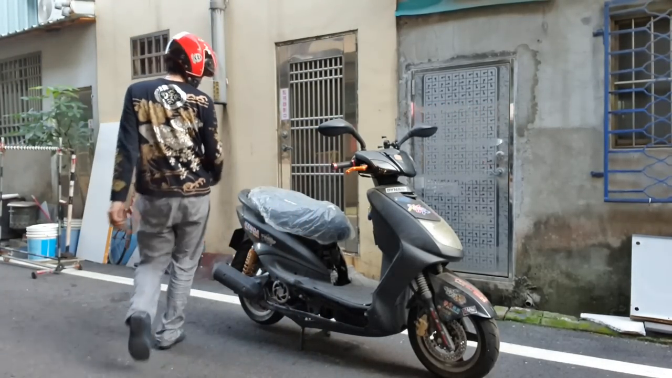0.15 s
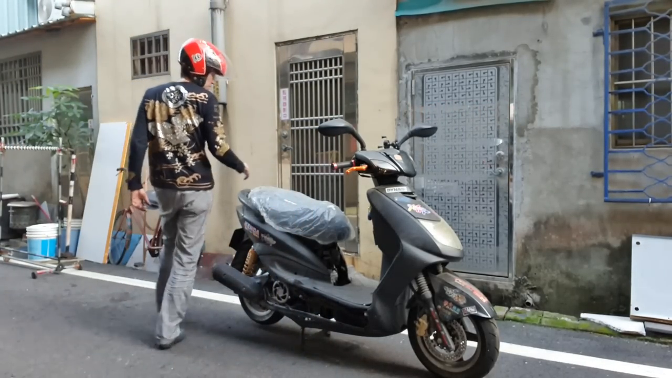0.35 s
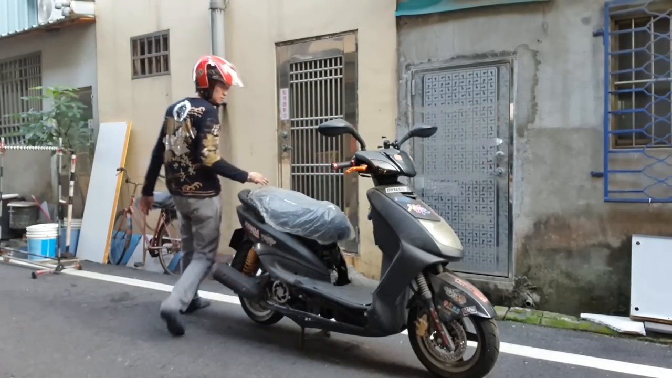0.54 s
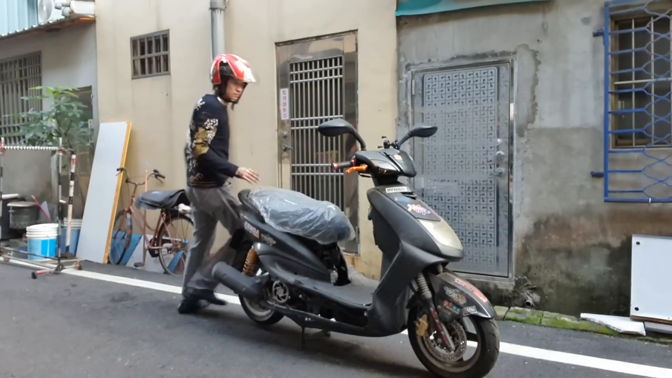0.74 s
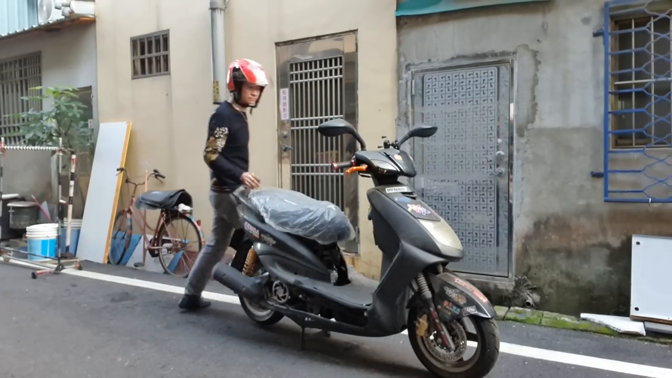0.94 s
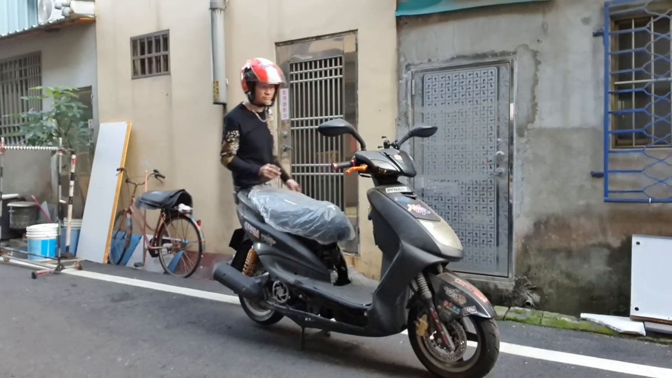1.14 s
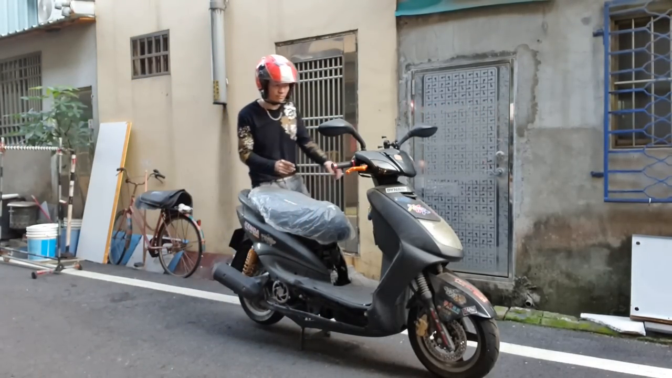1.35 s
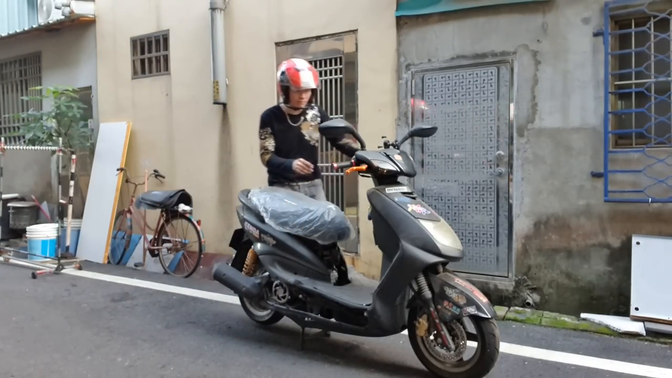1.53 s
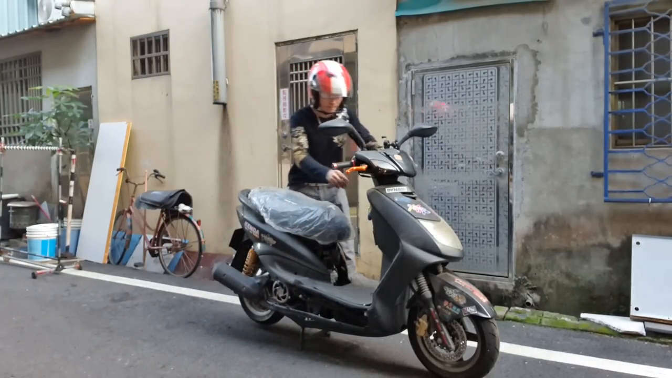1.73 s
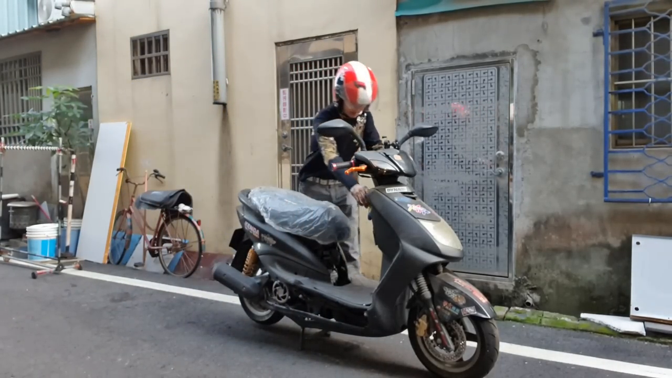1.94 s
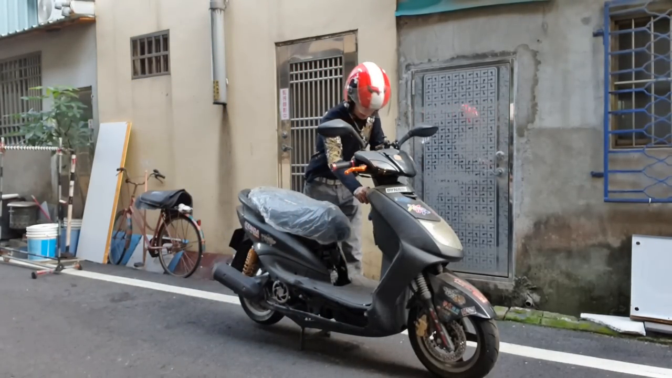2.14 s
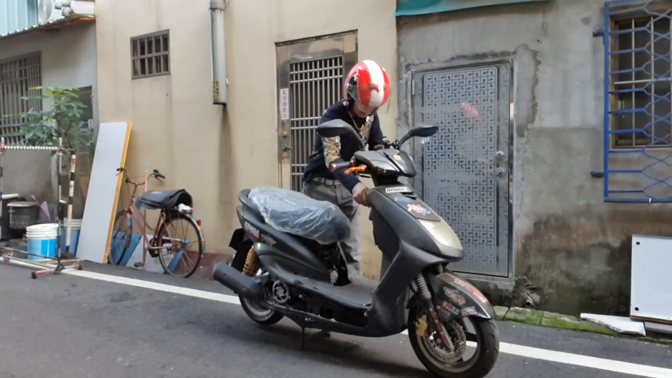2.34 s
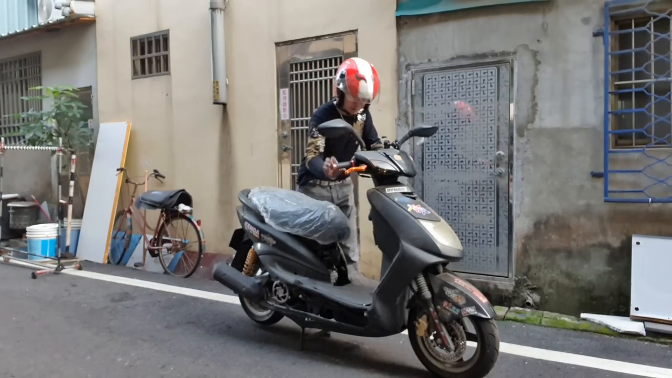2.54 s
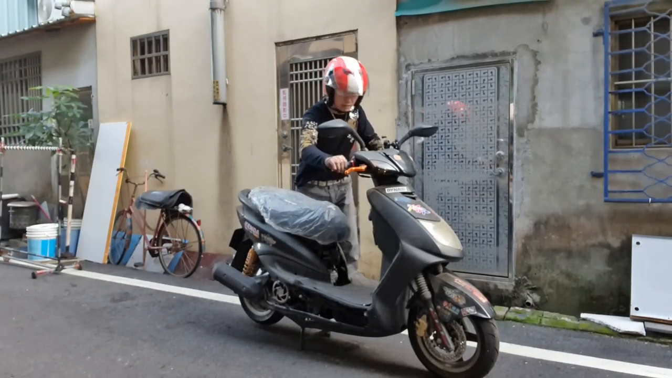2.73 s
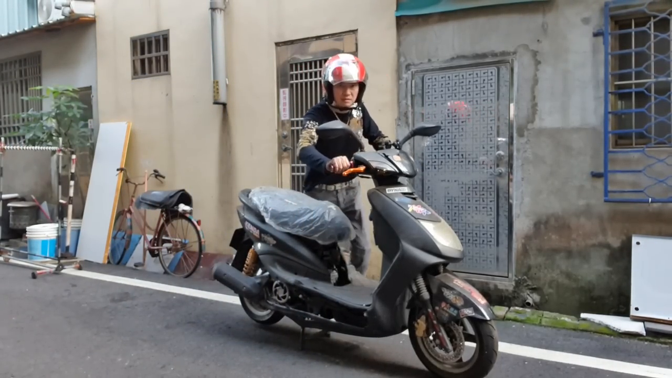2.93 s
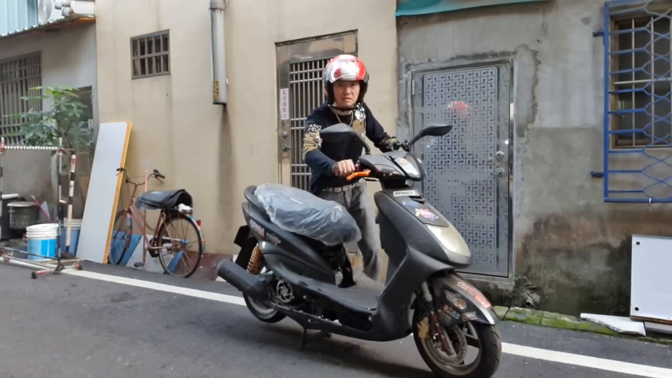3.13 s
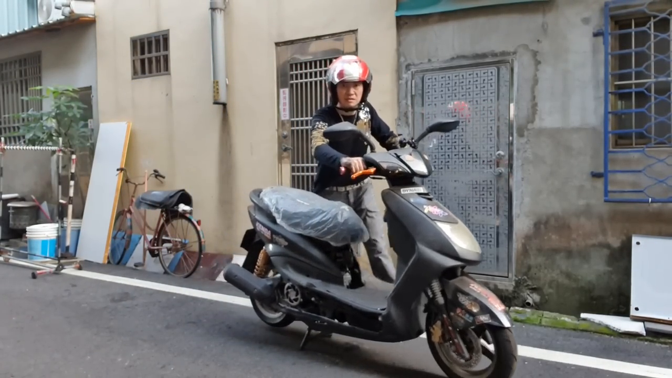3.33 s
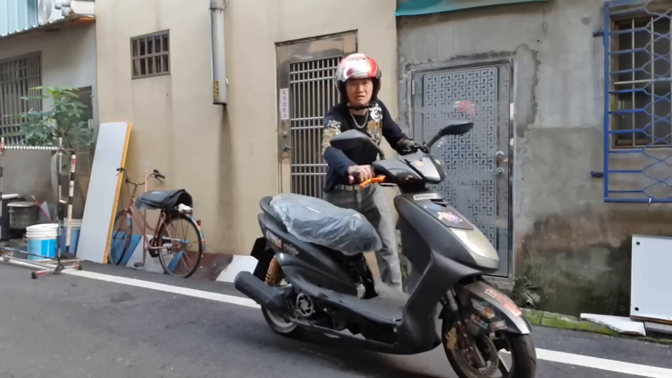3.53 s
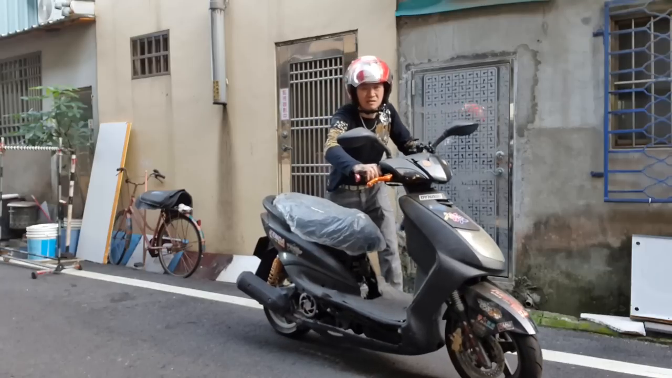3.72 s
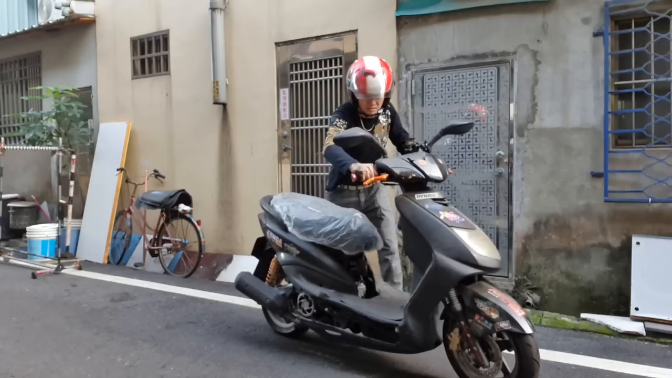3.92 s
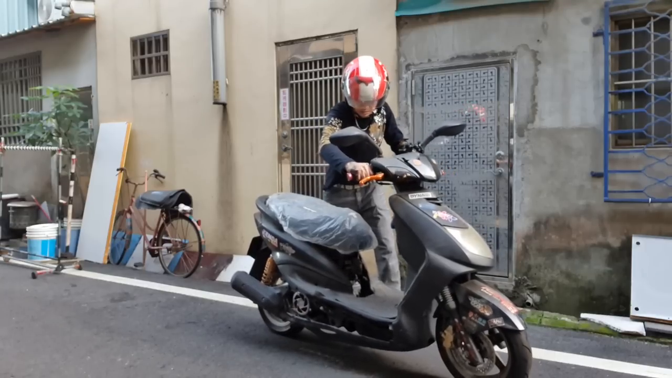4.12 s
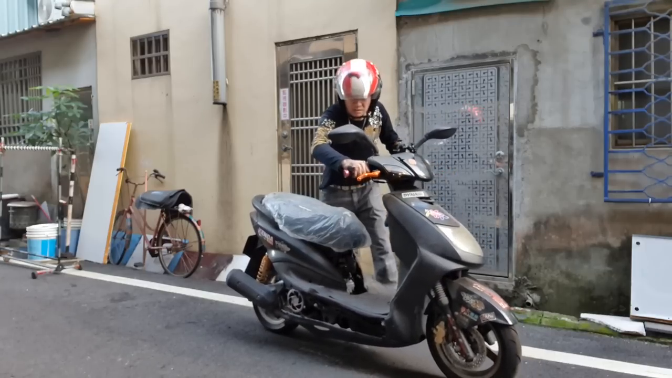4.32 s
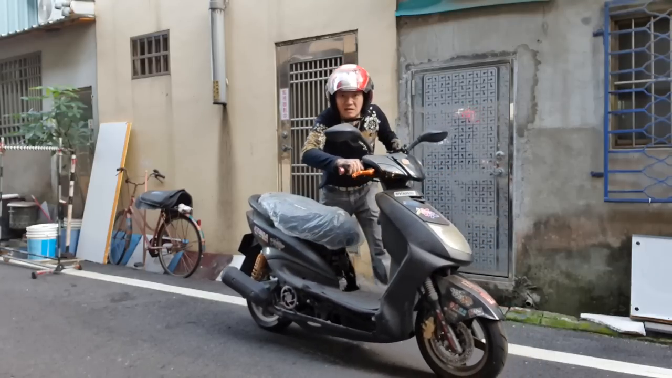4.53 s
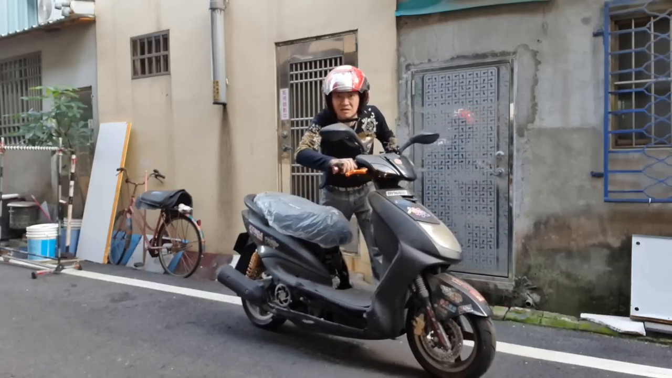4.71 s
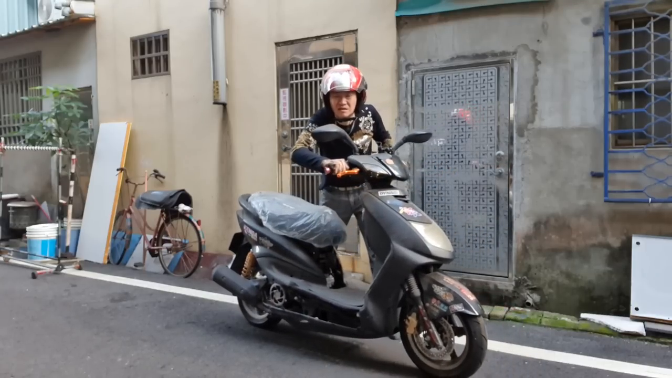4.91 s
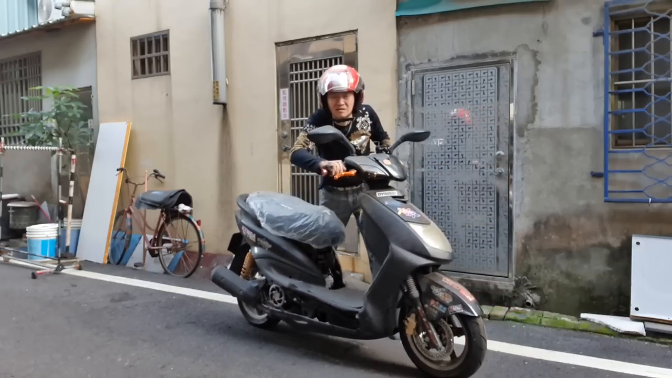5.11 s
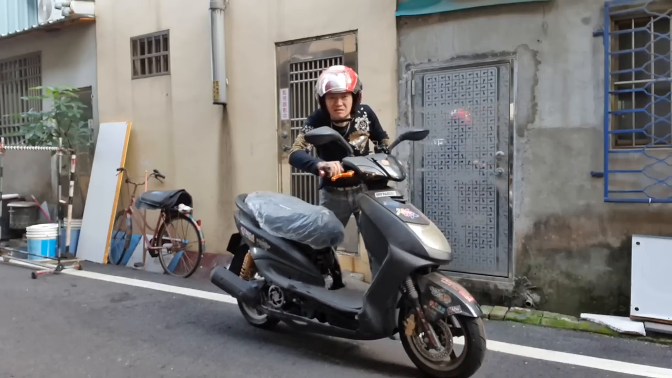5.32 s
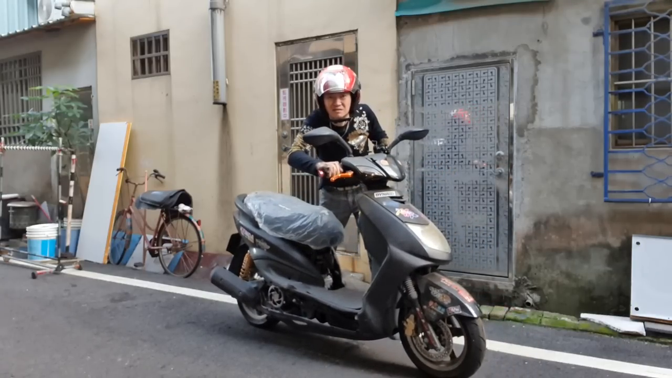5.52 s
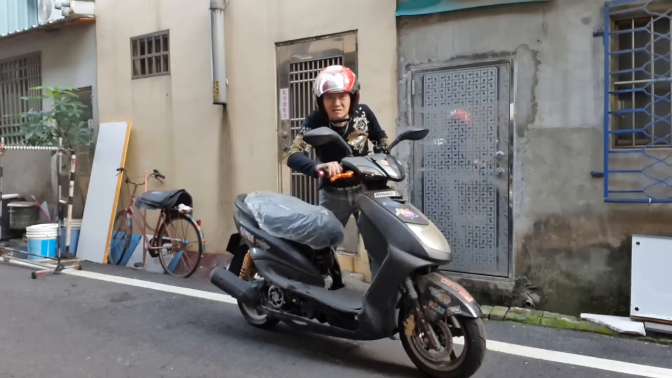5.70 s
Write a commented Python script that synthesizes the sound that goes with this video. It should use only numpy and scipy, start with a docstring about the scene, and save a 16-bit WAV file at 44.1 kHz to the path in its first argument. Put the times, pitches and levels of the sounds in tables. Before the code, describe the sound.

A stereo microphone stands a few metres from a scooter in a narrow street whose hard walls echo. A low, restless town rumble runs throughout, with a distant engine drone fading in the first second and very faint squeals. A shoe scuffs at the start; light steps, tiny key jingles and cloth rustle follow until about 2 s. At 2.2 s a steering bolt clunks, hollow in the plastic body, with smaller clicks to 2.4 s. From 2.95 s the scooter rolls off its stand: growing rumble, rattles, spring creaks, then ringing metal clanks from 3.3 s, loudest at 3.6 s, and a soft bump. Quiet follows, with a faint scuff near 4.1 s. At 4.97 s the starter whirrs upward, slams in with a ringing bang at 5.13 s, and strains in short grinding bursts. The first boom comes at 5.45 s; from 5.57 s rapid low thumps and clatter begin the idle, continuing to the end.

```python
"""A low town rumble and a shoe scuff come first; clothes rustle as a rider walks up to a scooter in a street.
The key turns, a steering bolt clunks, and the scooter rolls off its stand, which snaps up (noise and ringing modes).
The starter whirrs (gliding partials), engages with a bang and strains against compression.
The single cylinder fires and idles: low resonances boom over clattering noise.
Close house walls, a decaying noise response, throw most of the nearby sounds back."""
import sys
import numpy as np
from scipy import signal
from scipy.fft import rfft, irfft, next_fast_len
from scipy.io import wavfile
from scipy.ndimage import uniform_filter1d

SR = 44100
rng = np.random.default_rng(int(sys.argv[2]) if len(sys.argv) > 2 else 0)


def generate_wav(signal):
    """Clip the signal to [-1, 1] and save it as 16-bit WAV at the path in sys.argv[1]."""
    frames = np.transpose(np.atleast_2d(signal))
    scaled = np.clip(frames, -1, 1) * 32767
    pcm = np.round(scaled).astype(np.int16)
    wavfile.write(sys.argv[1], SR, pcm)


N = 258426
TIME = np.arange(N) / SR
HALF_SECOND, QUARTER_SECOND = np.arange(SR // 2) / SR, np.arange(SR // 4) / SR

# Reverberation between the house walls. Each row: frequency in Hz, decay by 60 dB in seconds.
STREET_T60 = [(100, 0.32), (400, 0.8), (1500, 0.67), (4000, 0.63), (9000, 0.5), (15000, 0.53)]
# Likeness of the two ears' signals. Each row: frequency in Hz, correlation from 0 to 1.
EAR_LIKENESS = [(60, 0.95), (130, .98), (290, 0.88), (640, 0.53), (1400, 0.0044), (4000, 0.18), (15000, 0)]
# Sideways balance of the nearby sounds. Each row: frequency in Hz, left minus right in dB.
SIDE_BALANCE = [(60, 1), (380, 0.5), (700, -0.5), (1300, -3), (4400, -6.5), (15000, -5.5)]
EDGE_HZ = 15900  # upper limit of the band

# Spectrum of the town rumble. Each row: frequency in Hz, density in dB per Hz.
TOWN_SPECTRUM = [(25, -39), (56, 0), (80, -8.5), (110, -8), (200, -14.5), (330, -16.5), (600, -21),
                 (1000, -28.5), (1800, -34.5), (3100, -50.5), (5000, -53), (7500, -63.5), (9800, -54),
                 (16000, -70.5)]
# A distant engine's drone swells. Each row: middle in seconds, length in seconds, level in dB.
DRONE_SWELLS = [(.17, 0.89, -38), (1.0, 0.36, -48)]
# Faint squeals down the street. Each row: start in seconds, length in seconds, level in dB,
# pitch at the start in Hz, pitch at the end in Hz.
FAR_SQUEALS = [(0.429, 0.14, -72, 5140, 4910), (.58, 0.31, -79, 4200, 3860), (0.709, 0.158, -56, 790, 727),
               (.88, 0.14, -56, 770, 748)]
DRONE_HZ = 104.7
# the steady rumble, and how much louder it is at first, for how long
TOWN_DB, TOWN_EARLY_DB, TOWN_SETTLE_S = -47.5, 2.5, 0.85

# Shoe scuffs. Each row: start in seconds, level in dB, brightness in dB per octave.
SHOE_SCUFFS = [(.017, -39.5, -4), (.44, -51, -6), (.976, -41.5, -7), (1.895, -47, -5), (4.105, -43, -9)]
# Jingles of the key ring. Each row: start in seconds, level in dB, brightness in dB per octave.
KEY_JINGLES = [(.473, -64, 0.5), (.636, -55.5, 13), (2.02, -65, 5), (2.126, -59.5, 0.5)]
# Clothing rustles. Each row: middle in seconds, length in seconds, level in dB.
CLOTH_RUSTLES = [(.55, 0.5, -57), (1.0, 0.44, -56), (1.7, .35, -60.5), (1.98, 0.45, -62.5)]
# Spectrum of scuffs, jingles and rustles. Each row: frequency in Hz, density in dB per Hz.
SCUFF_SPECTRUM = [(100, -21), (300, -4), (800, -3), (2000, -6), (5000, -8.5), (7500, -21.5), (9800, -10.5),
                  (16000, -33)]
# Steering lock, bolt first. Each row: start in seconds, level in dB, brightness in dB per octave.
LOCK_BLOWS = [(2.199, -25.5, -1.5), (2.305, -35, 0), (2.336, -33.5, -1.5), (2.376, -43, -6),
              (2.425, -44.5, 2)]
# Spectrum of the lock. Each row: frequency in Hz, density in dB per Hz.
LOCK_SPECTRUM = [(120, -53), (230, -26), (375, -12.5), (510, -12), (640, -14), (790, -9), (1050, -12),
                 (1260, -14), (1980, -13), (4400, -17.5), (6500, -23.5), (7800, -28.5), (9750, -22),
                 (16000, -34)]
# Modes of the plastic fairing. Each row: frequency in Hz, relative level in dB, decay by 60 dB in seconds.
FAIRING_MODES = [(263, -4.5, 0.18), (378, 3.5, 0.13), (641, 2, 0.13), (763, 1.5, 0.12), (920, -8, .12),
                 (1238, -4.5, 0.14)]
SCUFF_T60_S, JINGLE_T60_S, LOCK_T60_S = 0.19, 0.25, 0.14  # decay at 2 kHz
BOLT_SLIDE_S = 0.006  # rise of the lock's blows

# Centre stand clanks. Each row: start in seconds, level in dB, brightness in dB per octave,
# decay by 60 dB at 2 kHz in seconds.
STAND_CLANKS = [(2.952, -40, -1.5, 0.12), (3.342, -22, .5, 0.068), (3.43, -20, -1.5, 0.093),
                (3.512, -27, -7, .11), (3.608, -26.5, 6, 0.091), (3.616, -11, -0.5, .11),
                (3.72, -30, -2.5, 0.13)]
# Spectrum of clanks and rattles. Each row: frequency in Hz, density in dB per Hz.
STAND_SPECTRUM = [(71, -25.5), (120, -11.5), (341, -18), (473, -8.5), (546, -13.5), (805, -12), (911, -14),
                  (1030, -10), (2870, -16.5), (3740, -14), (4590, -22.5), (5870, -26.5), (7500, -40),
                  (9210, -34), (16000, -57)]
# Modes of the frame. Each row: frequency in Hz, relative level in dB, decay by 60 dB in seconds.
FRAME_MODES = [(303, -4.5, 0.195), (481.3, 4, 0.24), (820.5, 1.5, .25), (1035, 0.5, 0.22), (1473, 1, .2),
               (2510, -8, .2), (3200, -3, 0.16), (3680, -9, .25), (3880, -1, 0.34), (4040, -8, .25),
               (5100, -15, .2), (5700, -12.5, .18)]
# Suspension creaks. Each row: start in seconds, level in dB, pitch in Hz.
SPRING_CREAKS = [(3.101, -34, 1610), (3.126, -27.5, 1430), (3.503, -15.5, 1630), (3.536, -26.5, 1810),
                 (3.56, -27, 1495)]
# Soft bumps of tyres and feet. Each row: start in seconds, level in dB, pitch in Hz.
SOFT_BUMPS = [(0.975, -45, 90), (3.438, -27, 108), (3.509, -29, 81), (3.62, -31.5, 146.8),
              (4.198, -35, 99.2)]
# Spectrum of the rolling. Each row: frequency in Hz, density in dB per Hz.
ROLL_SPECTRUM = [(25, -32.5), (42, -21), (65, 3), (150, -0.5), (220, -3.5), (650, -7.5), (1070, -15.5),
                 (1440, -17), (2860, -30), (3940, -34.5), (7500, -46.5), (10500, -42.5), (16000, -58)]
# Spectrum of the scraping stand foot. Each row: frequency in Hz, density in dB per Hz.
SCRAPE_SPECTRUM = [(500, -29.5), (3200, -15), (3950, 1), (4600, -14.5), (7500, -27.5), (9800, -15),
                   (16000, -32)]
# the push grows louder with speed until the wheel lands, then dies away
PUSH_START_S, PUSH_ATTACK_S, PUSH_END_S = 2.95, 0.11, 3.554
ROLL_DB, ROLL_GROWTH_DB_PER_S, ROLL_FALL_DB_PER_S = -32.5, 12, 45.5
# scraping foot and rattling loose parts, relative to the rolling
SCRAPE_DB, RATTLE_DB = -26.5, -7
RATTLE_COUNT, RATTLE_TILT_DB, RATTLE_T60_S, RATTLE_SPAN_S = 12, -3.5, 0.09, 0.91

# Harmonics of the free-running gear. Each row: multiple of the mesh frequency, relative level in dB.
FREE_HARMONICS = [(1, 1), (2, -2.5), (3, -12), (4, -13)]
# Harmonics of the loaded gear. Each row: multiple of the mesh frequency, relative level in dB.
LOADED_HARMONICS = [(1, -33), (2, 2), (3, -19), (4, -3.5)]
# Strains against compression. Each row: start in seconds, length in seconds, whine in dB, rasp in dB,
# mesh frequency at the start in Hz, mesh frequency at the end in Hz.
COMPRESSION_STRAINS = [(5.338, 0.036, -24.5, -22.5, 987, 922), (5.405, 0.039, -18.5, -19.5, 976, 585),
                       (5.5411, .021, -18.5, -17, 945, 699)]
# Spectrum of the gear rasp. Each row: frequency in Hz, density in dB per Hz.
GEAR_SPECTRUM = [(180, -43), (300, -17.5), (447, -5), (689, -11), (900, -11.5), (1360, -1), (1780, -2),
                 (2840, -8.5), (3830, -5), (5610, -17.5), (6740, -30), (9240, -23), (16000, -42)]
# The pinion grazes the ring gear before it bites: middle in seconds, length in seconds, level in dB.
PINION_GRAZE = (5.058, 0.071, -27.5)
# the free gear mesh climbs evenly to its top, then sags and fades as the drive takes hold
SPIN_START_S, SPIN_UP_S = 4.974, 0.066
MESH_START_HZ, MESH_TOP_HZ, MESH_SAG_HZ_PER_S = 453.5, 1021, 1086
WHINE_DB, WHINE_DB_PER_OCTAVE, WHINE_FALL_DB_PER_S = -28.5, 11.5, 110
RASP_DB, RASP_FALL_DB_PER_S = -35, 148
LASH = 0.06  # rms pitch wander from play between the teeth, as a fraction

# Starter drive slamming home. Each row: start in seconds, level in dB, brightness in dB per octave,
# decay by 60 dB at 2 kHz in seconds.
ENGAGE_BLOWS = [(5.1295, -8.5, 2.5, 0.13), (5.139, -10, -4.5, 0.09), (5.149, -14, -0.5, 0.11)]
# Spectrum of the slam. Each row: frequency in Hz, density in dB per Hz.
ENGAGE_SPECTRUM = [(70, -37), (200, -17.5), (320, -5.5), (440, -1), (555, 1), (700, -6.5), (900, -9.5),
                   (1250, -3.5), (1650, -1.5), (2300, -10), (3700, -13), (8000, -25.5), (9300, -21.5),
                   (16000, -34)]
# Modes of the crankcase. Each row: frequency in Hz, relative level in dB, decay by 60 dB in seconds.
CRANKCASE_MODES = [(284, -13, 0.9), (325, 4.5, 0.21), (351, -9, 0.78), (445, -6, 0.26), (531, 3.5, 0.11),
                   (741, -12.5, 0.8), (1050, -5.5, 0.3), (1254, 2.5, 0.15), (1340, -19, 0.17),
                   (1420, -6, 0.23), (1670, -6, 0.25), (1700, -4, 0.14), (2510, -2.5, 0.13)]

# Firings. Each row: start in seconds, level in dB, silencer resonance in Hz.
ENGINE_FIRINGS = [(5.449, -25.5, 84.4), (5.568, -21, 89.5), (5.648, -21.5, 88.3), (5.722, -21, 91),
                  (5.7995, -20.5, 89.7)]
# Silencer modes. Each row: multiple of the firing's resonance, level in dB, time to the peak in seconds.
SILENCER_MODES = [(1, 1.5, 0.013), (1.9, -5, 0.022), (.7, -21, 0.0049), (2.9, -23, 0.0048)]
# Spectrum of the engine clatter. Each row: frequency in Hz, density in dB per Hz.
CLATTER_SPECTRUM = [(120, -24), (200, -1.5), (259, -8.5), (316, -5), (500, -5.5), (590, -5.5), (763, -12.5),
                    (1180, -8), (2610, -10), (3690, -11.5), (7010, -32), (7830, -34), (9580, -24.5),
                    (15100, -39.5), (16000, -36)]
# clatter: a shudder when the crank is jerked round, then a steady level once it fires
SHUDDER_DB, SHUDDER_ATTACK_S, SHUDDER_FALL_DB_PER_S = -27, 0.037, 48
RUNNING_DB, RUNNING_ATTACK_S = -32, 0.13
# air pumped through the silencer
PUMP_CRANKING_DB, PUMP_RUNNING_DB = -34.5, -39


def amp(db):
    """Logarithmic level: decibels to amplitude gain."""
    return 10 ** (np.asarray(db) / 20)


def evened(x):
    """Power normalisation: scales to unit rms."""
    return x / np.sqrt(np.mean(x ** 2) + 1e-20)


def read(points, hz):
    """Interpolation: reads a table along a logarithmic frequency axis."""
    f, value = np.transpose(points)
    return np.interp(np.log(hz + 1), np.log(f + 1), value)


def add(mix, s, sound):
    """Superposition: mixes a sound in at time s."""
    part = mix[:, max(round(s * SR), 0):][:, :sound.shape[-1]]
    part += sound[..., :part.shape[1]]


def envelope(start, attack_s, end, fall_db_per_s):
    """Exponential decay: gain rises from start, holds until end, then falls evenly in dB."""
    rise = np.clip((TIME - start) / attack_s, 0, 1)
    return rise * amp(-fall_db_per_s * np.maximum(TIME - end, 0))


def arches(rows):
    """Amplitude modulation: one squared-cosine swell for each (middle s, length s, dB) row."""
    return sum(amp(db) * np.cos(np.pi * np.clip((TIME - s) / length, -.5, .5)) ** 2
               for s, length, db in rows)


def waver(size, seconds):
    """Random modulation: smooth drift of unit rms."""
    window = np.hanning(int(seconds * SR) + 3)
    return evened(signal.fftconvolve(rng.standard_normal(size), window, "same"))


def ear_spread(hz):
    """Interaural coherence: the phase angle between the ears that gives the tabled likeness."""
    return np.arccos(np.clip(read(EAR_LIKENESS, hz), -1, 1))


def noise(colour, size, tilt_db=0, grit_db=0):
    """Spectral shaping: stereo noise, alike in the bass, diffuse in the treble; grit clumps it into grains."""
    length = next_fast_len(size)
    hz = np.fft.rfftfreq(length, 1 / SR)
    grains = amp(grit_db * evened(uniform_filter1d(rng.standard_normal(length), size=60)))
    a, b = rfft(rng.standard_normal((2, length)) * grains)
    same = np.clip(read(EAR_LIKENESS, hz), -1, 1)
    mid, side = a * np.sqrt(1 + same), b * np.sqrt(1 - same)
    # the tilt pivots at 1 kHz and levels out below 200 Hz
    gain = amp(read(colour, hz) + tilt_db * np.log2(np.maximum(hz, 200) / 1000))
    return evened(irfft(np.array([mid + side, mid - side]) * gain, length)[:, :size])


def fade(x, t60):
    """Frequency-dependent damping: each band dies away at its own rate, given as (Hz, t60 s)."""
    hz, t, z = signal.stft(x, SR, nperseg=256)
    damped = z * amp(-60 * t / read(t60, hz)[:, None])
    return signal.istft(damped, SR, nperseg=256)[1][:, :x.shape[1]]


def ring(modes, t):
    """Modal decay: a sum of damped sines, at another phase on each side in the treble."""
    hz, db, t60 = np.transpose(modes)[:, :, None]
    spread = ear_spread(hz) * rng.choice([-1, 1], hz.shape) / 2
    decay = amp(db - 60 * t / t60) / np.linalg.norm(amp(db))
    return np.array([(decay * np.sin(2 * np.pi * hz * t + side * spread)).sum(0) for side in (-1, 1)])


def knocks(rows, colour, rise, bass_hold, treble_hold, grit_db, modes=None, modes_db=0):
    """Impact excitation: a blow makes decaying noise and rings the body; dull blows barely reach high modes."""
    out, t = np.zeros((2, N)), HALF_SECOND
    closing = np.minimum(1, (t[-1] - t) * 10)
    for s, db, tilt_db, t60 in rows:
        damping = [(250, t60 * bass_hold), (2000, t60), (12000, t60 * treble_hold)]
        blow = fade(noise(colour, len(t), tilt_db, grit_db), damping)
        if modes is not None:
            lowest_hz = modes[0][0]
            struck = [(hz, mode_db + tilt_db * np.log2(hz / lowest_hz), decay)
                      for hz, mode_db, decay in modes]
            blow = blow + amp(modes_db) * ring(struck, t)
        add(out, s, amp(db) * blow * (1 - np.exp(-t / rise)) * closing)
    return out


def swell(t, hz, peak_s):
    """Resonant build-up: a low tone that grows, peaks at peak_s and dies."""
    return -(t / peak_s * np.exp(1 - t / peak_s)) ** 1.54 * np.sin(2 * np.pi * hz * t)


def whine(hz, orders, jitter):
    """Harmonic series: a tone of wandering pitch whose higher partials reach each side at another phase."""
    phase = 2 * np.pi * np.cumsum(hz * (1 + jitter * waver(len(hz), seconds=0.0013))) / SR
    out = 0
    for multiple, db in orders:
        k = round(multiple)
        spread = ear_spread(k * hz.mean()) / 2
        out = out + amp(db) * np.sin(k * phase + np.array([[-1], [1]]) * spread)
    return evened(out)


def street(x, wet_db):
    """Reverberation: convolution with the dense, decaying echoes between the house walls."""
    t = np.arange(SR) / SR
    nearly_white = [(20, 0.012), (20000, 0.011)]
    first_echo = np.clip((t - .008) / 0.0046, 0, 1)
    tail = fade(noise(nearly_white, SR), STREET_T60) * first_echo
    echoes = signal.fftconvolve(x, tail / np.linalg.norm(tail[0]), axes=1)[:, :N]
    return x + amp(wet_db) * echoes


def town():
    """Distant sources: a restless noise rumble, a droning engine's harmonics that fade, faint gliding squeals."""
    settling = np.maximum(1 - TIME / TOWN_SETTLE_S, 0)
    rumble = amp(TOWN_DB + TOWN_EARLY_DB * settling) * noise(TOWN_SPECTRUM, N)
    rumble = rumble * amp(0.65 * waver(N, seconds=.06))
    drone = arches(DRONE_SWELLS) * whine(np.full(N, DRONE_HZ), [(1, -0.5), (2, -21.0)], jitter=.06)
    squeals = np.zeros((2, N))
    for s, length, db, start_hz, end_hz in FAR_SQUEALS:
        glide = np.linspace(start_hz, end_hz, int(length * SR))
        add(squeals, s, amp(db) * np.hanning(len(glide)) * whine(glide, [(1, 0)], jitter=.04))
    return rumble + drone + street(squeals, wet_db=-0.5)


def rider():
    """Friction and impact: steps, jingles and clothes as noise; the steering bolt also rings the hollow fairing."""
    light = [(*row, SCUFF_T60_S) for row in SHOE_SCUFFS] + [(*row, JINGLE_T60_S) for row in KEY_JINGLES]
    steps = knocks(light, SCUFF_SPECTRUM, rise=0.0013, bass_hold=0.59, treble_hold=0.77, grit_db=2.5)
    clothes = arches(CLOTH_RUSTLES) * noise(SCUFF_SPECTRUM, N, tilt_db=-6.5, grit_db=3.0)
    blows = [(*row, LOCK_T60_S) for row in LOCK_BLOWS]
    lock = knocks(blows, LOCK_SPECTRUM, rise=BOLT_SLIDE_S, bass_hold=1.45, treble_hold=0.93, grit_db=4)
    t = HALF_SECOND
    add(lock, LOCK_BLOWS[0][0], amp(-24.5) * ring(FAIRING_MODES, t) * (1 - np.exp(-t / BOLT_SLIDE_S)))
    return street(steps + clothes, wet_db=-2.5) + street(lock, wet_db=-6)


def roll_off():
    """Rolling noise and impact: lumpy grinding, rattles, creaking springs, bumps and the stand's clanks."""
    push = envelope(PUSH_START_S, PUSH_ATTACK_S, PUSH_END_S, ROLL_FALL_DB_PER_S)
    push = push * amp(ROLL_DB - ROLL_GROWTH_DB_PER_S * np.maximum(PUSH_END_S - TIME, 0))
    out = knocks(STAND_CLANKS, STAND_SPECTRUM, rise=0.0014, bass_hold=1.76, treble_hold=1.0, grit_db=2.5,
                 modes=FRAME_MODES, modes_db=-8.5)
    out += push * noise(ROLL_SPECTRUM, N, grit_db=0.5) * amp(2.66 * waver(N, seconds=0.03))
    out += push * amp(SCRAPE_DB) * noise(SCRAPE_SPECTRUM, N, grit_db=3)
    # one rattle at a random moment in each equal slice of the span
    moments = PUSH_START_S + RATTLE_SPAN_S * (np.arange(RATTLE_COUNT) + rng.random(RATTLE_COUNT)) / RATTLE_COUNT
    rattles = [(s, RATTLE_DB, RATTLE_TILT_DB, RATTLE_T60_S) for s in moments]
    out += push * knocks(rattles, STAND_SPECTRUM, rise=0.0012, bass_hold=1.44, treble_hold=1.0, grit_db=3.5)
    t, bumps = QUARTER_SECOND, np.zeros((2, N))
    for s, db, hz in SPRING_CREAKS:
        peak = [(hz / 3, -30), (hz * 0.84, -3), (hz, 0), (hz * 1.26, -8), (hz * 4, -40), (16000, -60)]
        slip = noise(peak, len(t))
        add(out, s, amp(db) * slip * np.exp(-t / 0.0037) * (1 - np.exp(-t / 0.00065)))
    for s, db, hz in SOFT_BUMPS:
        add(bumps, s, amp(db) * swell(t, hz, peak_s=0.022))
    return street(out, wet_db=-8) + bumps


def starter():
    """Gear-mesh tone: pitch follows motor speed, climbing as it spins up and sagging at each compression."""
    top_s, bite_s = SPIN_START_S + SPIN_UP_S, ENGAGE_BLOWS[0][0]
    climb_hz = np.interp(TIME, [SPIN_START_S, top_s], [MESH_START_HZ, MESH_TOP_HZ])
    hz = climb_hz - MESH_SAG_HZ_PER_S * (np.clip(TIME, top_s, bite_s) - top_s)
    free = envelope(SPIN_START_S, 0.0072, bite_s - .015, 900)  # from switching on until the drive bites
    slowing_s = np.maximum(TIME - top_s, 0)
    whine_db = WHINE_DB + WHINE_DB_PER_OCTAVE * np.log2(hz / MESH_TOP_HZ) - WHINE_FALL_DB_PER_S * slowing_s
    teeth = free * amp(whine_db) * whine(hz, FREE_HARMONICS, jitter=LASH)
    rasp_gain = free * amp(RASP_DB - RASP_FALL_DB_PER_S * slowing_s) + arches([PINION_GRAZE])
    rasp = rasp_gain * noise(GEAR_SPECTRUM, N, grit_db=1.5)
    for s, length, strain_db, rasp_db, start_hz, end_hz in COMPRESSION_STRAINS:
        u = np.arange(0, 2, 1 / (length * SR))  # time in lengths of the strain
        mesh_hz = np.interp(u, [0, 1], [start_hz, end_hz])
        effort = np.interp(u, [0, .2, .7, 1], [0.58, 0.94, 0.48, 0.13])
        add(teeth, s, amp(strain_db) * effort * whine(mesh_hz, LOADED_HARMONICS, jitter=LASH))
        # the grinding peaks as the piston nears the top
        grinding = np.interp(u, [0, .5, 1, 1.5], [0.37, 0.94, 0.44, 0.15])
        add(rasp, s, amp(rasp_db) * grinding * noise(GEAR_SPECTRUM, len(u), grit_db=3))
    # play between the teeth makes the whine jump in loudness as well as pitch
    teeth = teeth * amp(3.6 * waver(N, seconds=0.0043))
    return street(teeth, wet_db=-4.0) + street(rasp, wet_db=-4.5)


def engagement():
    """Impact and modal ringing: the drive slams home in three quick blows and the crankcase rings."""
    bang = knocks(ENGAGE_BLOWS, ENGAGE_SPECTRUM, rise=0.00037, bass_hold=2.0, treble_hold=0.89, grit_db=0.5)
    t, casing = HALF_SECOND, np.zeros((2, N))
    add(casing, 5.135, amp(-7) * ring(CRANKCASE_MODES, t) * (1 - np.exp(-t / .004)))
    return street(bang, wet_db=-10.5) + street(casing, wet_db=-11.5)


def engine():
    """Pulse-excited resonance: firings boom in the silencer; valve gear and belt drive clatter at crank rate."""
    t, exhaust = QUARTER_SECOND, np.zeros((2, N))
    puff_spectrum = [(60, -18), (150, 4), (500, -14), (1500, -12), (8000, -42)]
    for s, db, hz in ENGINE_FIRINGS:
        boom = sum(amp(mode_db) * swell(t, hz * multiple, peak_s)
                   for multiple, mode_db, peak_s in SILENCER_MODES)
        puff = noise(puff_spectrum, len(t)) * np.exp(-t / 0.03) * (1 - np.exp(-t / 0.0022))
        add(exhaust, s, amp(db) * (boom + amp(-9) * puff))
    # the piston pumps air through the silencer, before it catches and after
    air = noise([(30, -37), (60, -22), (90, 3), (140, -16), (220, -16), (500, -58), (2000, -90)], N)
    jerk_s = ENGAGE_BLOWS[0][0]
    cranking = envelope(jerk_s, SHUDDER_ATTACK_S, jerk_s + SHUDDER_ATTACK_S, SHUDDER_FALL_DB_PER_S)
    running = np.clip((TIME - ENGINE_FIRINGS[0][0]) / RUNNING_ATTACK_S, 0, 1)
    pumping = np.hypot(amp(PUMP_CRANKING_DB) * cranking, amp(PUMP_RUNNING_DB) * running) * air
    # one steady crank rate, two turns for each firing
    second_s, third_s = ENGINE_FIRINGS[1][0], ENGINE_FIRINGS[2][0]
    crank = 4 * np.pi * (TIME - second_s) / (third_s - second_s)
    clatter_gain = np.hypot(amp(SHUDDER_DB) * cranking, amp(RUNNING_DB) * running)
    clatter = clatter_gain * noise(CLATTER_SPECTRUM, N, grit_db=0.5) * amp(0.67 * np.cos(crank))
    return street(exhaust, wet_db=-7.5) + pumping + street(clatter, wet_db=-4.5)


def scene():
    """Interaural level difference: the nearby treble leans to the right; the town is left unleaned."""
    near = rider() + roll_off() + starter() + engagement() + engine()
    length = next_fast_len(N + SR // 10)
    lean_db = read(SIDE_BALANCE, np.fft.rfftfreq(length, 1 / SR))
    leaned = rfft(near, length) * amp(np.array([lean_db, -lean_db]) / 2)
    return irfft(leaned, length)[:, :N] + town()


def record(dry):
    """Saturation and band limiting: peaks round off softly, then a low-pass filter cuts the top."""
    rounded = 1.1 * np.tanh(dry / 1.1)
    low_pass = signal.firwin(511, EDGE_HZ, window=("kaiser", 9), fs=SR)
    return signal.oaconvolve(rounded, low_pass[None], "same")


dry = scene()
out = record(dry)
generate_wav(out)
```